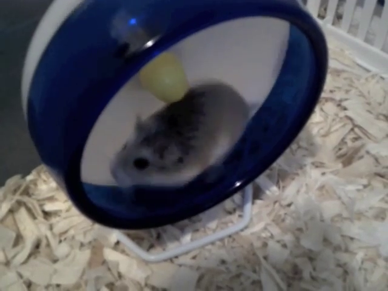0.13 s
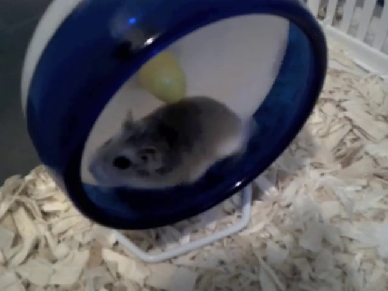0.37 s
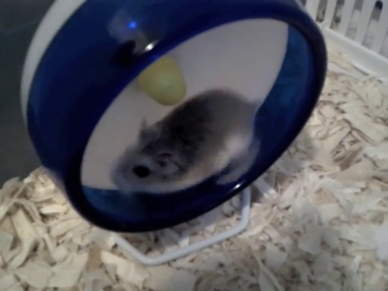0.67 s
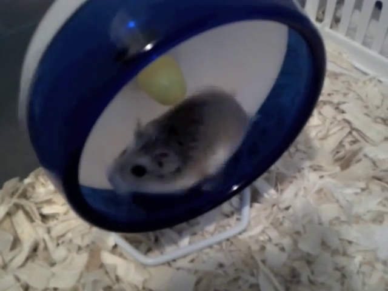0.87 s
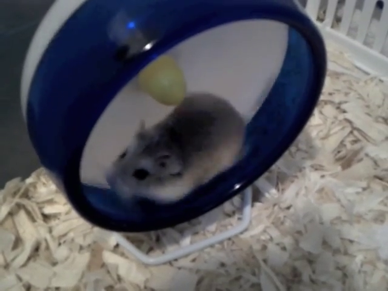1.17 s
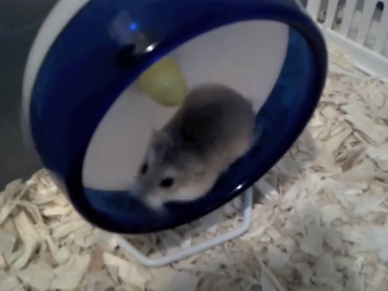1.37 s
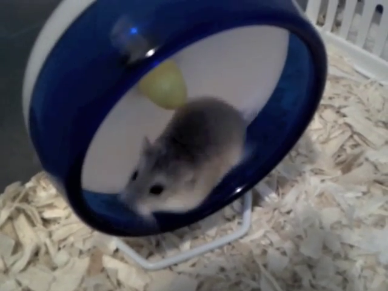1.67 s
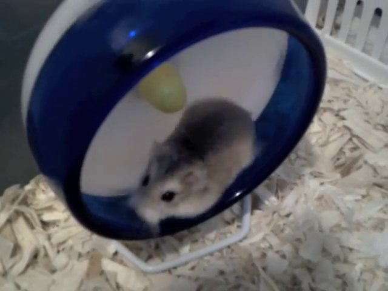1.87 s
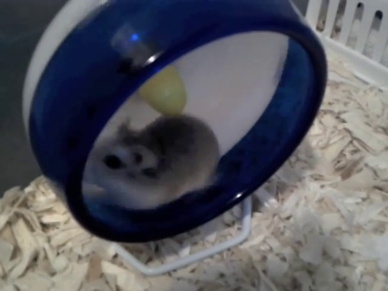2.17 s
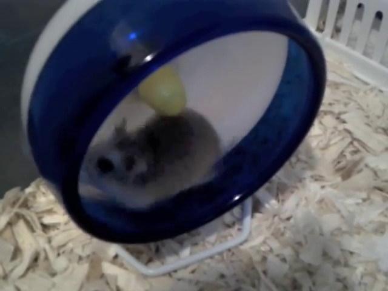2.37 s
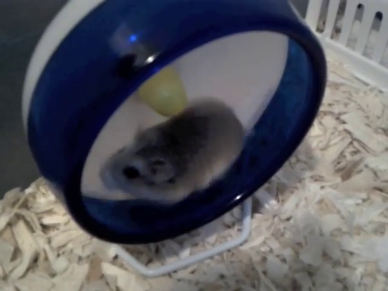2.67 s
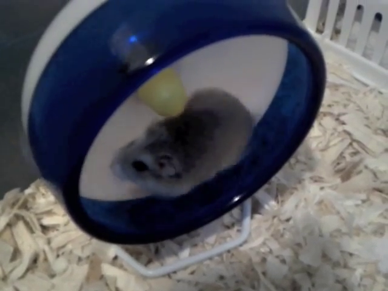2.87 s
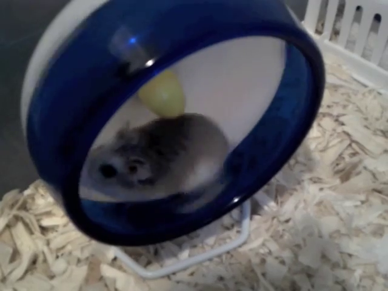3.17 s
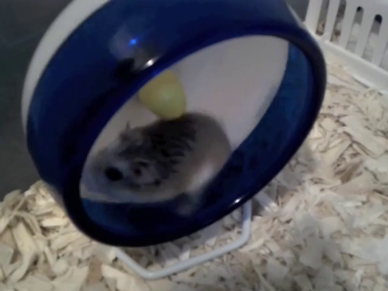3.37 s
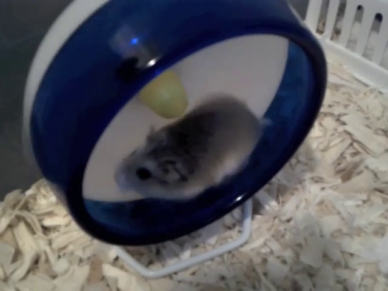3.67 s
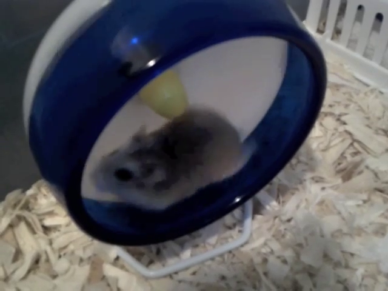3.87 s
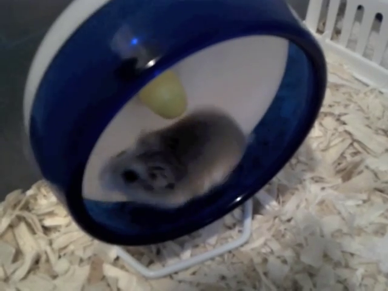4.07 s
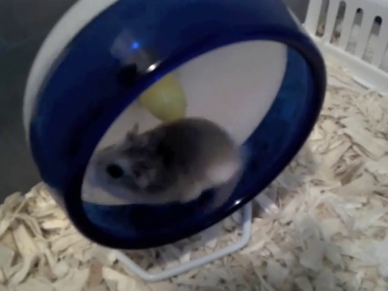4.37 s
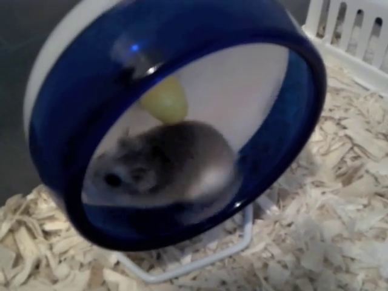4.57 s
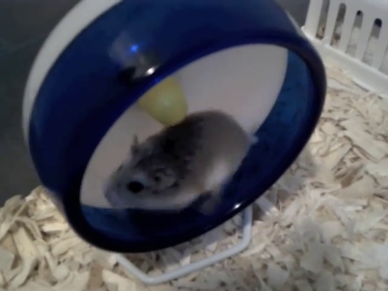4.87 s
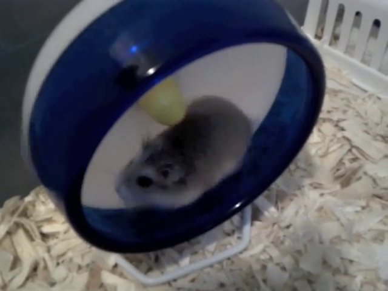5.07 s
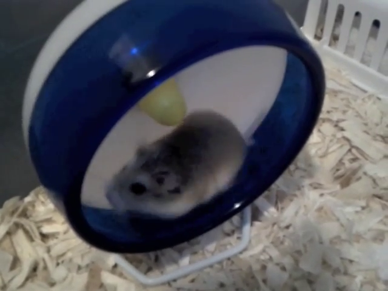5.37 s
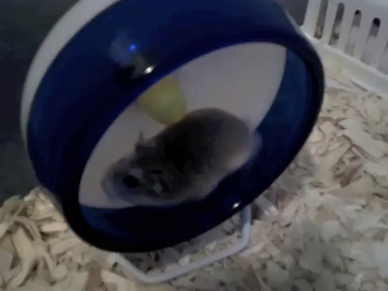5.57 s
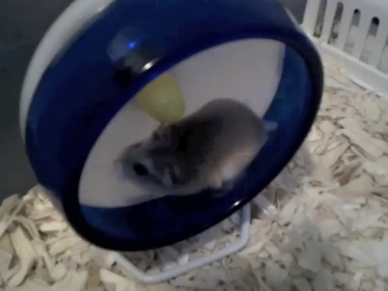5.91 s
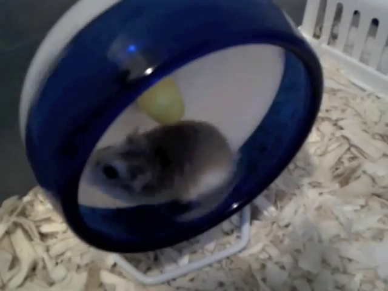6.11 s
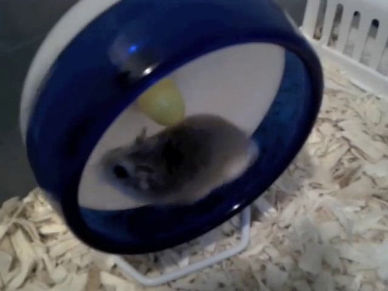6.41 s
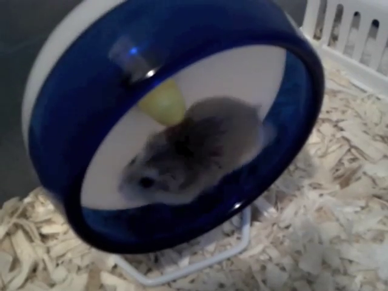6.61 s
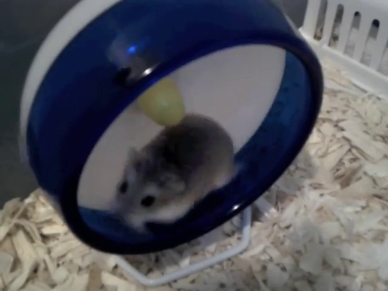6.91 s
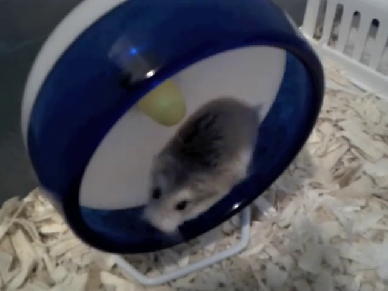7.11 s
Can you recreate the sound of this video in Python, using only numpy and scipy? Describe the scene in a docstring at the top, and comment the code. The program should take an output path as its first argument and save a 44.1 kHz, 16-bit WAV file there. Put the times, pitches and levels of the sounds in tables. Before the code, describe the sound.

Close up in a quiet room, an exercise wheel rattles lightly under a running hamster: about eleven little steps a second, muffled pad thumps and brittle claw clicks, busiest around two and three seconds. A constant electrical hum sits beneath, with soft background noise. Thin axle chirps come in the second half, then a fridge-like motor starts with a shudder, low buzz and faint whine. Mono, with limited treble.

```python
"""Dwarf hamster running in a plastic wheel

Inside a cage, soft paws drum on the wheel's shell, claws tick and scrabble on its track, and the axle
rubs and now and then chirps: noise and sharp touches ring banks of resonances, the chirps are sines.
In the room an appliance hums steadily as sines over smooth background noise, and late on a second motor,
probably a fridge compressor, shudders into life as resonant noise, then a throbbing buzz and a thin whine."""
import sys
import numpy as np
from scipy import signal
from scipy.fft import rfft, irfft
from scipy.io import wavfile

SR = 44100
rng = np.random.default_rng(int(sys.argv[2]) if len(sys.argv) > 2 else 0)


def put_to_file(sound):
    """Save the sound as 16-bit audio at rate SR, in the file named by the first command-line argument."""
    columns = np.atleast_2d(sound).T  # one column per channel
    safe = np.clip(columns, -1, 1)
    whole_steps = np.round(safe * 32767)
    wavfile.write(sys.argv[1], SR, whole_steps.astype(np.int16))


N = 319725
TIME = np.arange(N) / SR

# low resonances of the wheel: (frequency [Hz], width [Hz], level [dB])
SHELL = [(601.6, 43, 3.5), (625.5, 9.6, -5.5), (864, 14, 3), (1043, 45, -8), (1120, 62, 1), (1161, 40, 0),
         (1385.4, 18, 4), (1466, 11, -1)]
# high resonances of the running track: (frequency [Hz], width [Hz], level [dB])
TRACK = [(3700, 43, 2), (4060, 400, 0.5), (4290, 36, -4), (4830, 240, 1), (4980, 26, -9.5), (5040, 69, 0.5),
         (5590, 110, -0.5), (5900, 33, 1.5), (6340, 55, 0), (6570, 270, -12), (6930, 26, -24.5)]
# how hard the hamster runs, as the level of its patter before trim: (time [s], level [dB])
EFFORT = [(0.0, -53), (0.34, -52), (0.66, -51.5), (1.8, -57), (2.5, -53.5), (3.84, -52.5), (4.26, -54),
          (4.83, -50.5), (5.53, -54.5), (5.75, -53), (6.76, -55.5), (7.25, -59.5)]

START_S, RUN_UP_S = 5.56, 0.21   # the compressor switches on and comes up to speed


def from_db(db):
    """Decibels to gain."""
    return 10 ** (np.asarray(db) / 20)


def rms_one(x):
    """Scale to rms 1."""
    return x / np.sqrt(np.mean(x ** 2) + 1e-20)


def strength(sound):
    """Scale a hit to the energy of 5 ms at rms 1."""
    return sound / np.sqrt(np.sum(sound ** 2) / (SR / 200))


def in_time(rows):
    """The columns of a curve at every sample."""
    s, *columns = np.transpose(rows)
    return [np.interp(TIME, s, column) for column in columns]


def add(out, s, sound):
    """Mix a short sound in at time s."""
    at = max(round(s * SR), 0)
    out[at:at + len(sound)] += sound[:max(N - at, 0)]


def ramp(start, length):
    """Rises from 0 to 1 and stays."""
    return np.clip((TIME - start) / length, 0, 1)


def envelope(start, attack, hold, release):
    """Attack, hold and release."""
    return ramp(start, attack) - ramp(start + attack + hold, release)


def swell(middle, half):
    """A rounded rise and fall."""
    return np.cos(np.pi / 2 * np.clip((TIME - middle) / half, -1, 1)) ** 2


def drift(rate):
    """Slow chance with spread 1: noise through two equal poles at rate Hz, drawn every 40 samples."""
    r = np.exp(-2 * np.pi * rate * 40 / SR)
    noise = rng.standard_normal(N // 40 + 2002)
    slow = signal.lfilter([1], [1, -2 * r, r * r], noise)[2000:]   # skip the filter's start
    return np.interp(np.arange(N) / 40, np.arange(len(slow)), rms_one(slow))


def tone(hz):
    """A sine of rms 1 on a steady or moving pitch."""
    cycles = np.cumsum(hz * np.ones(N)) / SR
    return np.sqrt(2) * np.sin(2 * np.pi * (cycles + rng.random()))


def band(x, low_hz, high_hz):
    """Butterworth band-pass."""
    return signal.sosfilt(signal.butter(2, [low_hz, high_hz], "band", fs=SR, output="sos"), x)


def resonate(x, hz, width):
    """One resonance with a gain of about 1 on top; a wider one rings shorter."""
    r = np.exp(-np.pi * width / SR)
    zeros = np.array([1, 0, -1]) * (1 - r * r) / 2
    poles = [1, -2 * r * np.cos(2 * np.pi * hz / SR), r * r]
    return signal.lfilter(zeros, poles, x + 1e-18)


def body(x, modes):
    """Resonances in parallel."""
    return sum(from_db(db) * resonate(x, hz, width) for hz, width, db in modes)


def air():
    """The air of the room: smooth background noise, coloured across the spectrum."""
    # colour of the noise: (frequency [Hz], relative density [dB per Hz])
    air_colour = [(25, -17.5), (42, -10), (65, 0), (95, -12), (135, -6), (190, 3), (270, 3), (470, 1),
                  (720, -4.5), (1000, -4), (1300, -7.5), (2900, -17), (5000, -19.5), (7500, -33)]
    hz, db = np.transpose(air_colour)
    bins = np.maximum(np.arange(N // 2 + 1) * SR / N, 1)
    colour = from_db(np.interp(np.log(bins), np.log(hz), db))
    noise = irfft(rfft(rng.standard_normal(N)) * colour, N)
    return from_db(-52) * rms_one(noise)


def appliance(flutter_db=0.21, waver_hz=2, waver_db=4.0):
    """One strong steady-pitched tone, with weak unsteady fan tones around it."""
    # faint, wavering tones of its fan: (mean frequency [Hz], mean level [dB rms])
    fan_tones = [(58.2, -75), (119.9, -72), (179, -72.5), (238, -67), (315, -69.5), (398, -65), (599, -64)]
    hum_hz, hum_db = 360.06, -34.5
    sag_db = 1.24   # the tone sags as the compressor loads the mains
    level = hum_db - sag_db * ramp(START_S, RUN_UP_S) + flutter_db * drift(8)
    out = from_db(level) * tone(hum_hz)
    for hz, db in fan_tones:
        out += from_db(db + waver_db * drift(3)) * tone(hz + waver_hz * drift(3.71))
    return out


def compressor(slip=.0006, buzz_waver_db=1, whine_waver_db=2):
    """The motor shakes on its mounts while it runs up, then settles into a throbbing buzz with a thin whine."""
    # low buzz: (multiple of the shaft rate, level at speed [dB rms], change as the pressure builds [dB/s])
    buzz_tones = [(1, -74, 0.5), (3.023, -57, -7.5), (4, -62, 3.5), (10.98, -67.5, 0), (14.01, -61.5, 1.5),
                  (26, -71, 1)]
    # thin whine of the casing: (multiple of the shaft rate, level before its envelope [dB rms])
    whine_tones = [(33, -73.5), (39, -71.5), (42, -80), (43, -74.5), (45, -74), (46, -78.5), (48, -69.5),
                   (49, -73), (51, -70)]
    # the compressor on its mounts: (frequency [Hz], width [Hz], level [dB])
    mounts = [(196, 20, 6), (236, 43, -1), (272, 43, -6.5), (306, 76, -8)]
    shaft_hz = 59.21
    throb_hz, throb_depth, throb_below_hz = 2.9, 0.33, 300   # slow beat in the lowest buzz tones
    at_speed = START_S + RUN_UP_S
    shaft = shaft_hz * (1 + slip * drift(4))
    age = np.maximum(TIME - at_speed, 0)
    throb = throb_depth * np.cos(2 * np.pi * throb_hz * age)

    buzz = np.zeros(N)
    for k, db, change in buzz_tones:
        level = from_db(db + change * age + buzz_waver_db * drift(9.4))
        beat = 1 + throb * (k * shaft_hz < throb_below_hz)
        buzz += level * beat * tone(k * shaft)
    whine = sum(from_db(db + whine_waver_db * drift(14)) * tone(k * shaft) for k, db in whine_tones)
    shaking = band(body(rng.standard_normal(N), mounts), low_hz=151, high_hz=400)
    shudder = from_db(-48.5) * rms_one(shaking)

    whine_attack_s = 0.048   # the whine is full as the run-up ends
    whine_shape = envelope(at_speed - whine_attack_s, whine_attack_s, hold=1.09, release=0.41)
    shudder_shape = envelope(START_S, attack=0.05, hold=0.26, release=0.1)
    return ramp(START_S, RUN_UP_S) ** 2 * buzz + whine_shape * whine + shudder_shape * shudder


def axle():
    """The axle briefly sticks and sings a thin note of wavering pitch."""
    # chirps: (middle [s], half length [s], mean frequency [Hz], level at the top of the swell [dB rms])
    chirps = [(4.577, 0.072, 1730, -66), (5.192, 0.09, 1800, -59.5), (5.70, 0.067, 1820, -57)]
    out, bend_hz = np.zeros(N), 9.6 * drift(20)
    for s, half, hz, db in chirps:
        out += from_db(db) * swell(s, half) * tone(hz + bend_hz)
    return out


def patter(modes, per_s, spread_db, spot_db, t60, rub):
    """Light touches at random moments, each waking the resonances in its own mix, over even rubbing."""
    at = np.flatnonzero(rng.random(N) < per_s / SR)
    force_db = spread_db * (2 * rng.random(len(at)) - 1)
    grit, out = rng.standard_normal(N), np.zeros(N)
    decay = from_db(-120 / (t60 * SR))   # of energy, 60 dB down after t60 seconds
    for hz, width, db in modes:
        touches = np.zeros(N)
        touches[at] = from_db(force_db + spot_db * (2 * rng.random(len(at)) - 1))
        energy = signal.lfilter([1], [1, -decay], touches ** 2 + 1e-18)
        drive = grit * np.sqrt(energy / energy.mean() + rub ** 2)
        out += from_db(db) * resonate(drive, hz, width)
    return out


def running(drum_db=-1.13, bearing_db=-1):
    """The stream of small steps and the rubbing axle keep shell and track sounding."""
    # resonances that the rubbing axle keeps hissing: (frequency [Hz], width [Hz], level [dB])
    bearing = [(2024, 90, 5.5), (2143, 90, 0), (3960, 75, -9.5), (4145, 39, 2.5), (4274, 59, 2.5),
               (5420, 21, -9.5)]
    # the hamster loses its footing and scrambles: (middle [s], half length [s], extra scrabble [dB])
    scrambles = [(.15, 0.11, 1), (2.26, 0.22, 4), (3.155, 0.16, 1), (4.36, 0.27, 2.5)]
    scrabble_db, follows = -61.5, 0.92   # claws at mean effort; share of the effort's swing
    effort, = in_time(EFFORT)
    scrabble = scrabble_db + follows * (effort - effort.mean())
    scrabble += sum(db * swell(s, half) for s, half, db in scrambles)

    drum = patter(SHELL, per_s=60, spread_db=0.5, spot_db=2.0, t60=0.024, rub=1.0)
    drum = rms_one(band(drum, low_hz=475, high_hz=2010))
    scratch = patter(TRACK, per_s=75, spread_db=5.5, spot_db=6.0, t60=0.045, rub=.6)
    scratch = rms_one(band(scratch, low_hz=3240, high_hz=9100))
    hiss = from_db(bearing_db) * rms_one(body(rng.standard_normal(N), bearing))
    return from_db(effort + drum_db) * drum + from_db(scrabble) * (scratch + hiss)


def steps(per_s=10.8, jitter_s=.012, spread_db=7):
    """The ordinary steps of a slightly uneven gait, firmer with more effort.

    Rows: (time [s], level about the mean [dB], spot on the wheel [0-1])."""
    beats = np.arange(0, N / SR, 1 / per_s)
    shift, force, spot = rng.random((len(beats), 3)).T
    s = beats + jitter_s * (2 * shift - 1)
    effort, = in_time(EFFORT)
    level = np.interp(s, TIME, effort - effort.mean()) + spread_db * (2 * force - 1)
    return np.transpose([s, level, spot])


def mode_at(modes, spot):
    """The pitch of the resonance that a spot on the wheel favours."""
    return modes[int(spot * len(modes))][0]


def contact(snap, t60, tail_db, tail_t60):
    """A sharp first touch and a little grit, followed by the scatter between the cage walls."""
    t = TIME[:SR // 8]
    fade = from_db(-60 * t / t60) + from_db(tail_db - 60 * t / tail_t60)
    return snap * (t == 0) + rng.standard_normal(len(t)) * fade


def paws(gait, level_db=-1, spot_db=2, slap_db=0):
    """Soft pads slap the plastic and wake only the low resonances."""
    # the firmest paw falls: (time [s], level before trim [dB], ring [Hz])
    firm_paws = [(0.06, -39, 1150), (0.385, -41, 1150), (0.433, -43.5, 1060), (0.6, -43, 864),
                 (1.255, -42.5, 1160), (2.371, -42.5, 1200), (2.737, -48, 1090), (3.193, -43.5, 1160),
                 (3.284, -36.5, 870), (3.58, -42.5, 897), (3.76, -44.5, 1175), (4.034, -42, 864),
                 (4.762, -41, 1120), (4.945, -45, 1146), (5.269, -40, 990), (5.432, -42.5, 1120),
                 (5.985, -41.5, 814)]
    step_db = -52.5   # an ordinary step at mean effort, before trim
    light = [(s, step_db + db, mode_at(SHELL, spot)) for s, db, spot in gait]
    out = np.zeros(N)
    for s, db, hz in list(firm_paws) + light:
        touch = contact(snap=14, t60=0.016, tail_db=-14, tail_t60=0.27)
        touch = band(touch, low_hz=750, high_hz=1386)
        ring = strength(body(touch, SHELL)) + from_db(spot_db) * strength(resonate(touch, hz, width=36))
        slap = from_db(slap_db) * strength(touch)
        add(out, s, from_db(db + level_db) * strength(ring + slap))
    return out


def claws(gait, level_db=-6, spot_db=1, knock_db=3.0, crack_db=-5, clack_db=-2):
    """Each claw cracks, rings the track, most at the pitch of the spot it hits, and knocks on the rim."""
    # the sharpest claw hits on the running track, levels before trim:
    # (time [s], level [dB], ring [Hz], knock on the rim [dB])
    sharp_claws = [(0.1446, -43, 4630, -57), (0.2174, -33, 5050, -46), (0.5896, -41.5, 4460, -54),
                   (0.8131, -43, 4280, -52.5), (0.9617, -39, 5060, -56.5), (1.046, -43, 4900, -59),
                   (1.8861, -41, 5100, -52.5), (1.9869, -45.5, 4800, -52.5), (2.2059, -41, 5890, -63),
                   (2.2453, -41, 5080, -62), (2.2692, -40, 5090, -61), (2.3426, -34, 6290, -55),
                   (2.4406, -40.5, 4910, -56.5), (2.8674, -38.5, 3860, -60), (2.9642, -41.5, 5030, -60),
                   (3.1233, -36, 4840, -55), (3.1453, -34, 4760, -50), (3.1916, -39, 5120, -53),
                   (3.3084, -30.5, 3700, -46.5), (4.0276, -41, 5070, -64), (4.1131, -39, 3640, -58),
                   (4.3005, -42.5, 5830, -61), (4.3405, -39.5, 4830, -55), (4.5246, -39, 5000, -65),
                   (4.7137, -39, 4960, -45), (5.0968, -40.5, 5130, -65), (5.2694, -39, 4110, -59),
                   (5.5463, -41, 5150, -52), (5.8441, -35, 6220, -47.5), (5.8554, -40, 6270, -51),
                   (6.0561, -37.5, 5080, -65), (6.108, -37.5, 5300, -53), (6.128, -41, 5730, -57),
                   (6.563, -47, 4180, -51.5), (7.1257, -36.5, 5160, -60)]
    # resonances of the wheel's rim: (frequency [Hz], width [Hz], level [dB])
    rim_modes = [(2015, 25, 0.5), (2181, 50, 0.5), (2623, 110, -10)]
    step_db, step_knock_db = -51, -64   # an ordinary step at mean effort, before trim
    light = [(s, step_db + db, mode_at(TRACK, spot), step_knock_db + db) for s, db, spot in gait]
    out = np.zeros(N)
    for s, db, hz, knock in list(sharp_claws) + light:
        touch = contact(snap=8.2, t60=0.038, tail_db=-12.5, tail_t60=0.057)
        ring = strength(body(touch, TRACK)) + from_db(spot_db) * strength(resonate(touch, hz, width=45))
        crack = from_db(crack_db) * strength(band(touch, low_hz=2860, high_hz=5740))
        clack = from_db(clack_db) * strength(band(touch, low_hz=1730, high_hz=3300))
        rim = strength(strength(body(touch, rim_modes)) + clack)
        hit = from_db(db + level_db) * strength(ring + crack)
        add(out, s, hit + from_db(knock + knock_db) * rim)
    return out


def scene():
    """The room and its machines behind the hamster's wheel, in one channel."""
    machines = air() + appliance() + compressor()
    wheel, gait = axle() + running(), steps()
    return (machines + wheel + paws(gait) + claws(gait))[None]


def record(dry):
    """A narrow-band recorder behind the microphone cuts the top with two steep low-passes."""
    softened = signal.sosfilt(signal.butter(10, 7600, fs=SR, output="sos"), dry)
    return signal.sosfilt(signal.cheby2(16, 50, 8300, fs=SR, output="sos"), softened)


dry = scene()
out = record(dry)
put_to_file(out)
```